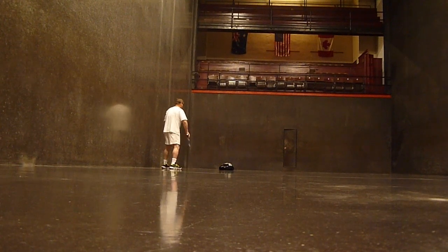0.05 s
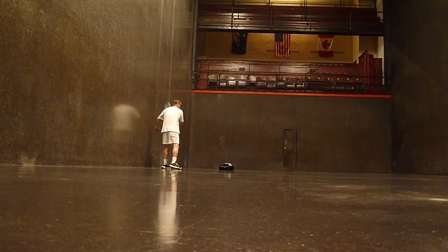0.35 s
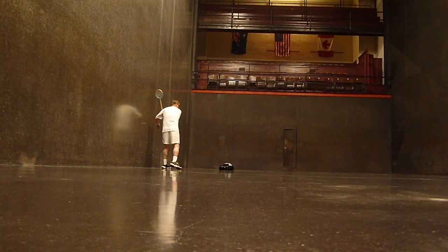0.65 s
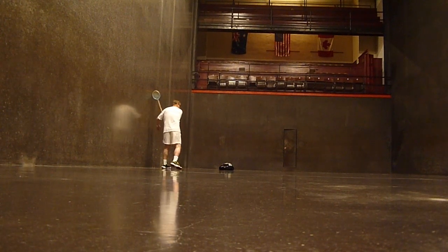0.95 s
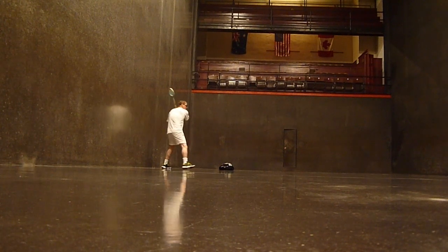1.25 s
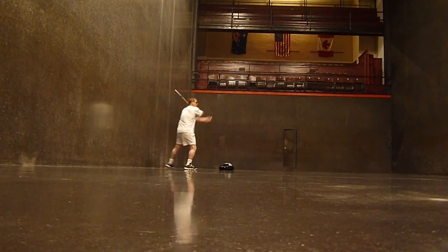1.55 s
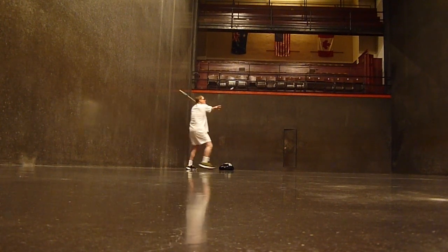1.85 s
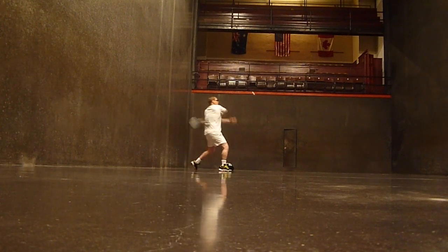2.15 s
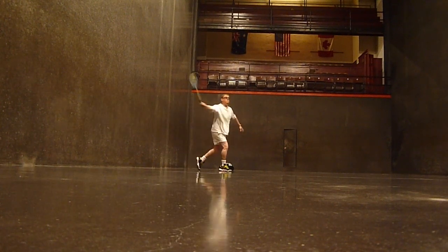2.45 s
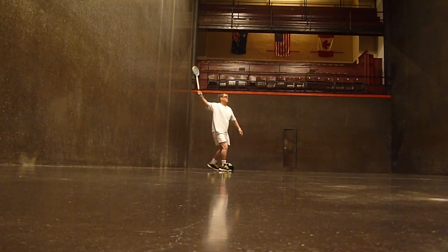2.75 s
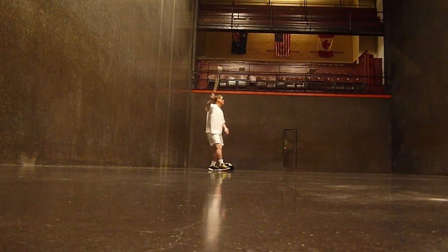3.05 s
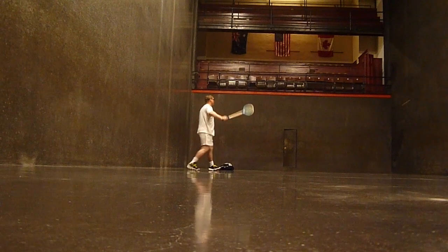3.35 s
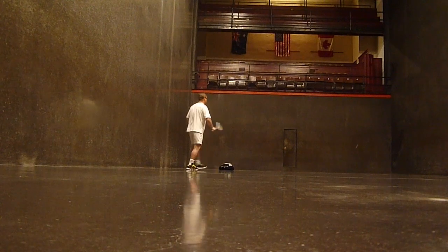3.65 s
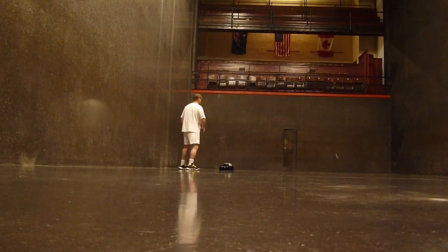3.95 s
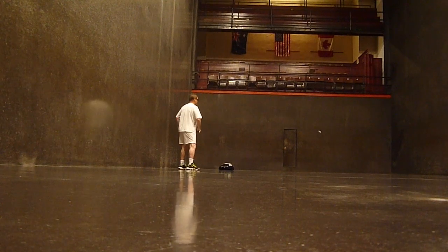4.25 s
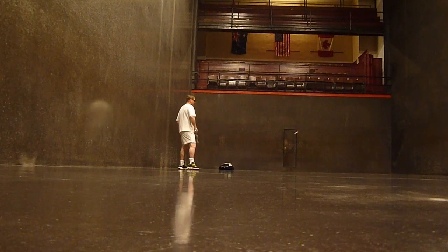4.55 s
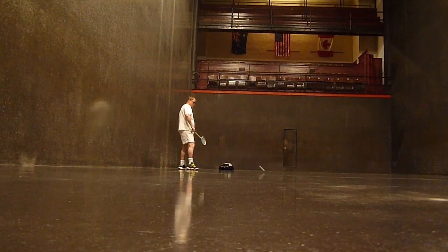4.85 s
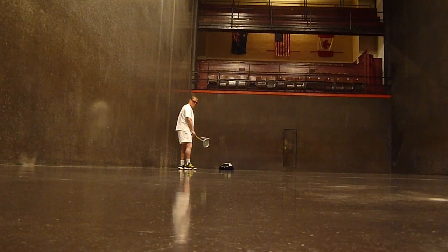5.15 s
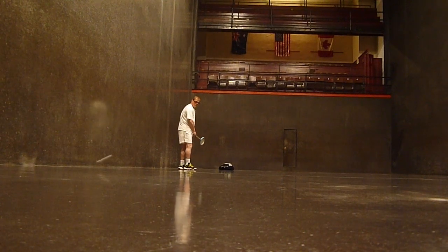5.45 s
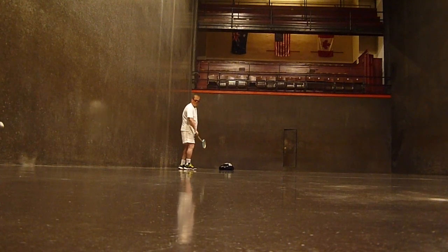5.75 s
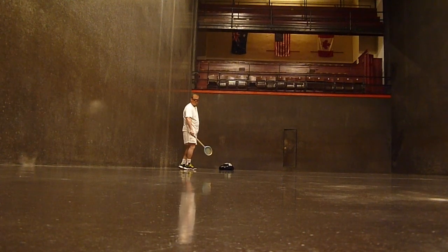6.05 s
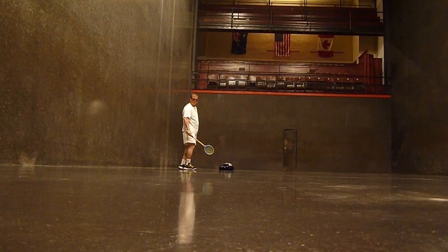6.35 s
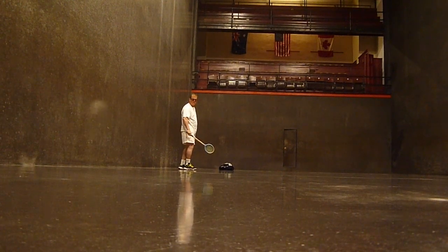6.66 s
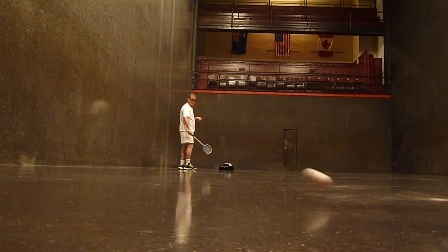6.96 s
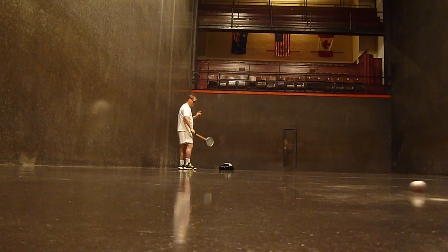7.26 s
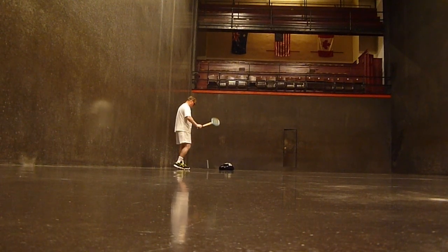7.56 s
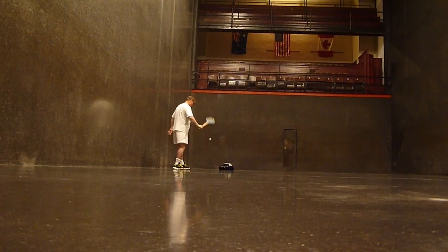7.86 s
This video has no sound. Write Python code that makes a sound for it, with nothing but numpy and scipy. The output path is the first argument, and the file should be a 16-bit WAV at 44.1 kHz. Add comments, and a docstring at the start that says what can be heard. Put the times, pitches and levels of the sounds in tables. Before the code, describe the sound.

A hard ball is served, cracks sharply against two walls with long ringing echoes, then bounces closer and knocks on a wooden panel.

```python
"""A small hard ball is served in a big stone-walled indoor court, heard from low at the front wall.
Air rushes round the racket, the strings pock, and the ball cracks on walls and floor, thuds into a
wooden panel nearby and bounces away. Each blow returns as slap echoes, timed by its place in the
court, and rings for seconds in the hall. Soft steps and a quiet ventilation rumble lie underneath."""
import sys
import numpy as np
from scipy import signal
from scipy.fft import rfft, irfft, next_fast_len
from scipy.io import wavfile

SR = 44100
rng = np.random.default_rng(int(sys.argv[2]) if len(sys.argv) > 2 else 0)


def log_audio(samples):
    """Write samples as a 16-bit WAV file to the path given in sys.argv[1]."""
    # one column per channel
    frames = np.atleast_2d(samples).T
    # limit to full scale, then quantise
    limited = np.clip(frames, -1, 1)
    pcm = np.round(limited * 32767).astype(np.int16)
    wavfile.write(sys.argv[1], SR, pcm)


N = 352387
TIME = np.arange(N) / SR
FREQ = np.arange(2049) * SR / 4096
# The smack of ball on strings. Each row: frequency in Hz, level in dB.
SMACK_SPECTRUM = [(60, -15), (150, -3), (300, -4.5), (600, 0.5), (1100, 4), (1520, -3.5), (2500, -7.5),
                  (4000, -11.5), (6400, -10.5), (7500, -22)]
# The wooden panel's modes, lowest first. Each row: frequency in Hz, level in dB, t60 in seconds.
PANEL_MODES = [(173.2, -2, 0.165), (205.06, -1, 0.1054), (279.8, -3.5, 0.0573), (407, -2.5, 0.047),
               (530.5, -2, 0.0237), (1004, -15, 0.012), (1420, -5.5, 0.0115), (5825, -11.5, 0.0099)]


def rally(field):
    """The ball's blows, each with its slap echoes and the long ring of the hall."""
    # A bounce still dying away as we come in: seconds before the start, centre in Hz, hall level in dB.
    before_s, tail_hz, tail_db = (.35, 3200, -47)
    out = np.zeros(N)
    for s, surface, place, db, sideways, end_db, direct, send, hall_db, build_s in blows():
        for sound in echoes(direct, send, place, surface, sideways, end_db):
            add(out, s, undb(db) * sound)
        add(out, s, undb(hall_db) * reverberate(send, field, build_s))
    add(out, -before_s, undb(tail_db) * reverberate(ball_click(tail_hz), field, build_s=0.036))
    return out


def blows():
    """Every hit on stone, strings or wood, with a direct sound and a send to the hall."""
    # Ball on stone. Each row: start in seconds, surface, x, y, z in metres, peak in dB, click centre
    # in Hz, send centre in Hz, sideways share 0-1, gain per end-wall reflection in dB, hall level
    # in dB, hall build-up in seconds.
    bounces = [ (2.6096, "end", 5.5, 0, 4, -5.5, 3520, 3980, 0.35, 0, -32, 0.0656),
               (3.7075, "end", 8.0, 18.5, 1.0, -9.5, 3604, 3377, 0.17, -2.5, -39.5, 0.095),
               (4.9475, "floor", 2.5, 10, 0, -34.5, 4000, 3087, .1, -3, -50, 0.037),
               (5.5857, "floor", 1.1, 5.5, 0, -33, 2610, 2555, 0.18, -3, -55, 0.036),
               (5.7348, "side", 0, 4.5, 0.89, -20, 2965, 2560, 0.55, -5.5, -51.5, .033),
               (6.1467, "floor", 1.1, 2.5, 0, -28, 2210, 2078, 0.1, -3.5, -58, 0.042),
               (6.4924, "floor", 1.38, 0.8, 0.5, -27.5, 1600, 1493, .4, -4, -63.5, .059),
               (6.8871, "floor", 2, 1.33, 0, -24.5, 1617, 1895, 0.21, -4, -64, .043),
               (7.0809, "floor", 2.5, 2.28, -0.5, -36.5, 1404, 1409, .5, -5.5, -75, .04),
               (7.6914, "floor", 1.9, 9.5, 0, -28.5, 3600, 3444, 0.19, -3, -47.5, 0.026)]
    # The serve and the thud on the panel: one such row each, without the two centres.
    serve = (2.3802, "end", 2.5, 9.1, 1.193, -16, 0.56, -7, -37.5, 0.005)
    thud = (6.5538, "end", 1.7, 0, .06, -14, .4, -2, -38, 0.0062)
    hits = [(s, surface, (x, y, z), db, sideways, end_db, ball_click(hz), ball_click(send_hz), *hall)
            for s, surface, x, y, z, db, hz, send_hz, sideways, end_db, *hall in bounces]
    for row, direct, send in (serve, racket(), pulse(SMACK_SPECTRUM)), (thud, panel(), panel_boom()):
        s, surface, x, y, z, db, sideways, end_db, *hall = row
        hits.append((s, surface, (x, y, z), db, sideways, end_db, direct, send, *hall))
    return hits


def ball_click(hz, rise=0.899, fall=3.433):
    """A small stiff ball radiates little bass, and its contact time cuts the treble."""
    ratio = FREQ / hz
    return impulse(ratio ** rise / np.sqrt(1 + ratio ** (2 * (rise + fall))))


def racket(strings_db=-7):
    """A broad smack with the strings' pock in it."""
    # The strings' brief ring. Each row: frequency in Hz, level in dB, t60 in seconds.
    string_modes = [(304.6, -6.5, 0.0238), (581, 0, 0.0234), (797, -1.5, 0.0217), (1050, -4, 0.0153),
                    (1340, -6, 0.0156), (1810, -1, 0.0174), (2198, -6.5, 0.0227), (3344, -13, 0.0089),
                    (4480, -7, 0.0157)]
    pock = undb(strings_db) * ring(string_modes, contact_s=0.0009)
    smack = pulse(SMACK_SPECTRUM)
    return pock + np.pad(smack, (0, len(pock) - len(smack)))


def panel(leak_hz=55):
    """The struck panel rings; air leaks round its edges and cancels the deepest bass."""
    low_cut = signal.butter(2, leak_hz, "high", fs=SR, output="sos")
    return signal.sosfilt(low_cut, ring(PANEL_MODES, contact_s=0.00079))


def panel_boom(ring_db=-17):
    """The panel's broad thump, with its lowest mode sounding on into the hall."""
    # The thump's colour. Each row: frequency in Hz, level in dB.
    thump_spectrum = [(50, -13.5), (120, -4), (170, 2.5), (210, -3), (280, -5), (380, -15.5), (600, -21),
                      (1200, -30.5), (3000, -47), (7000, -53)]
    thump = pulse(thump_spectrum)
    hum = undb(ring_db) * ring(PANEL_MODES[:1], contact_s=0.00086)
    return hum + np.pad(thump, (0, len(hum) - len(thump)))


def knocks():
    """Dull knocks under the bounces close beside the wall."""
    # Each row: start in seconds, rms level in dB, length in seconds, centre in Hz.
    close_bounces = [(6.148, -45, 0.0168, 648), (6.495, -43, 0.0134, 650)]
    out = np.zeros(N)
    for s, db, length_s, hz in close_bounces:
        noise = scattered(np.zeros(1), np.ones(1), length_s)
        burst = signal.fftconvolve(noise, ball_click(hz, rise=1.07, fall=3))
        add(out, s, undb(db) * burst / np.std(burst[:int(length_s * SR)]))
    return out


def air_rushes():
    """Air swells round the swung racket, then round the incoming ball, and stops at each impact."""
    # Each row: end in seconds, length in seconds, final rms level in dB, centre in Hz.
    swells = [(2.378, 0.041, -52, 1500), (2.611, 0.014, -28, 600)]
    out = np.zeros(N)
    for end_s, length_s, db, hz in swells:
        air = steady_noise(ball_click(hz, rise=0.55, fall=1.5))
        swell = np.clip(1 + (TIME - end_s) / length_s, 0, 1) * (TIME < end_s)
        out += undb(db) * air * swell
    return out


def echoes(direct, send, place, surface, sideways, end_db):
    """A blow with sharp and blurred echoes: stone mirrors it; uneven walls, roof and gallery scatter."""
    side_db, floor_db, roof_db = -1.33, -2.5, -14  # per reflection
    wall_scatter_db, gallery_scatter_db, roof_scatter_db = -11.5, -7, -3.5
    sharp_for_s, gallery_after_s = 0.322, 0.042
    lag_s, gain, (across, along, up) = mirror_paths(place, surface, sideways)
    roof_hits = (np.abs(up) + (up > 0)) // 2
    back_hits = (np.abs(along) + (along > 0)) // 2
    gain = gain * undb(side_db * np.abs(across) + floor_db * (np.abs(up) - roof_hits))
    kept = undb(end_db * np.abs(along))
    fade = np.exp(-(lag_s / sharp_for_s) ** 4)  # uneven walls give no sharp late echoes
    sharp = signal.fftconvolve(arrivals(lag_s, gain * kept * fade * undb(roof_db * roof_hits)), direct)
    under_roof = gain * (roof_hits == 0)
    walls = scattered(lag_s, under_roof * kept * (np.abs(across) + np.abs(along) > 2))
    # The gallery over the back wall scatters what that wall does not mirror.
    gallery = scattered(lag_s, under_roof * (1 - kept) * (back_hits == 1) * (lag_s > gallery_after_s))
    roof = scattered(lag_s, gain * kept * (roof_hits == 1))
    scatter = (undb(wall_scatter_db) * walls + undb(gallery_scatter_db) * gallery
               + undb(roof_scatter_db) * roof)
    blurred = signal.fftconvolve(scatter, send)
    first_peak = np.abs(sharp[:SR // 400]).max()
    return sharp / first_peak, blurred / first_peak


def mirror_paths(place, surface, sideways, orders=(9, 7, 3), beam_power=3.1, sound_m_s=343):
    """A blow's images in the court's six faces: lag in seconds, gain, signed reflections per axis."""
    # The court: width, length and height in metres.
    court = (9.22, 18.22, 11.8)
    # The microphone: metres from the left wall, the front wall and the floor.
    mic = (2.35, .18, .155)
    # The axis along which each surface is struck; a blow radiates most along it.
    strike_axis = {"side": 0, "end": 1, "floor": 2}
    grid = np.meshgrid(*[np.arange(-k, k + 1) for k in orders])
    images = np.stack(grid, axis=-1).reshape(-1, 3)
    ray = images * np.array(court) + np.where(images % 2, np.subtract(court, place), place) - mic
    metres = np.linalg.norm(ray, axis=1)
    aim = sideways + (1 - sideways) * (np.abs(ray[:, strike_axis[surface]]) / metres) ** beam_power
    return (metres - metres.min()) / sound_m_s, aim / metres, images.T


def arrivals(lag_s, sizes):
    """One spike for each path in the first half second."""
    return np.bincount(np.round(lag_s * SR).astype(int), sizes, minlength=SR // 2)[:SR // 2]


def scattered(lag_s, gains, smear_s=0.016):
    """Many small reflections smear each arrival into a short burst."""
    t = TIME[:SR // 4] / smear_s
    burst = t * np.exp(-4 * t)
    power = signal.fftconvolve(arrivals(lag_s, gains ** 2), burst / burst.sum())[:SR // 2]
    return np.sqrt(np.abs(power)) * rng.standard_normal(len(power))


def reverberate(sound, field, build_s, gap_s=.022, grain=.5, blend_s=0.2):
    """Reflections start after a gap, grainy at first, and thicken into a smooth tail; early rms 1."""
    bands, decays = field
    length = decays.shape[1]
    start = rng.integers(N - length)  # each sound gets its own pattern of reflections
    tail = np.einsum("bt,bt->t", bands[:, start:start + length], decays)
    t = np.maximum(TIME[:length] - gap_s, 0)
    spread = grain * np.exp(-t / blend_s)
    clumps = np.interp(t, np.arange(1000) / 1000, rng.standard_normal(1000))
    tail = tail * (1 - np.exp(-t / build_s)) * np.exp(spread * clumps - spread ** 2)
    wet = signal.oaconvolve(tail, sound)
    return wet / np.std(wet[SR // 20:SR // 3])


def hall_field():
    """Half-octave bands of diffuse sound, each with its own decay."""
    # How long the hall rings. Each row: frequency in Hz, t60 in seconds.
    ring_times = [(80, 5), (200, 5.5), (700, 5), (1500, 4.5), (2700, 4), (4200, 3), (6000, 1.86),
                  (7500, 0.23)]
    # The hall's colour. Each row: frequency in Hz, level in dB.
    hall_spectrum = [(50, 2), (170, 9), (280, 10), (450, 3), (800, 1.5), (1500, -2), (3000, -0.5),
                     (4500, 1), (5600, 1.5), (7000, -1)]
    centres = 45 * 2 ** (np.arange(16) / 2)
    size = next_fast_len(N)
    hz = np.maximum(np.arange(size // 2 + 1) * SR / size, centres[0])
    noise = rfft(rng.standard_normal(size)) * undb(lookup(hall_spectrum, hz))
    windows = (np.maximum(1 - 2 * np.abs(np.log2(hz / centre)), 0) for centre in centres)
    bands = np.array([irfft(noise * window, size)[:N] for window in windows])
    decays = np.exp(-np.log(1000) * TIME[:5 * SR] / lookup(ring_times, centres)[:, None])
    return bands, decays


def footsteps(field):
    """Soft, dull footfalls, heard only through the hall's reverberation."""
    # Each row: start in seconds, hall level in dB, build-up in seconds.
    steps = [(.835, -52, 0.024), (1.58, -66, 0.035), (1.86, -65.5, .03), (3.86, -56, .05),
             (4.97, -61, 0.022)]
    # Shoe on stone. Each row: frequency in Hz, level in dB.
    shoe_spectrum = [(60, -18), (160, -3), (240, -1.5), (350, 0.5), (680, 0.5), (860, 2.5), (1020, -10),
                     (1500, -7), (1900, -22), (7000, -42)]
    out = np.zeros(N)
    for s, db, build_s in steps:
        add(out, s, undb(db) * reverberate(pulse(shoe_spectrum), field, build_s))
    return out


def ventilation(rms_db=-53):
    """The quiet, steady rumble of moving air."""
    # Each row: frequency in Hz, relative level in dB.
    rumble_spectrum = [(20, -11), (45, -8.5), (80, -1), (130, 1), (175, 2), (260, -2.5), (500, -9),
                       (1000, -16.5), (2000, -21.5), (4000, -25), (7000, -30.5)]
    return undb(rms_db) * steady_noise(pulse(rumble_spectrum))


def ring(modes, contact_s):
    """Damped modes pushed together during a short contact; peak 1."""
    t = TIME[:SR // 4]
    sound = sum(undb(db - 60 * t / t60) * np.cos(2 * np.pi * hz * t) for hz, db, t60 in modes)
    sound *= 1 - np.exp(-t / contact_s)
    return sound / np.abs(sound).max()


def steady_noise(colour):
    """Noise with the spectrum of the given pulse; rms 1."""
    noise = signal.oaconvolve(rng.standard_normal(N), colour)[:N]
    return noise / np.sqrt(np.mean(noise ** 2))


def pulse(spectrum):
    """A single pulse coloured by (Hz, dB) points."""
    return impulse(undb(lookup(spectrum, FREQ)))


def impulse(gain):
    """Shortest causal pulse with this gain over FREQ; peak 1."""
    cepstrum = irfft(np.log(gain + 1e-5))
    cepstrum[1:len(gain) - 1] *= 2
    cepstrum[len(gain):] = 0
    click = irfft(np.exp(rfft(cepstrum)))
    return click / np.abs(click).max()


def lookup(table, hz):
    """Read (Hz, value) points on a log-frequency axis."""
    points, values = np.transpose(table)
    return np.interp(np.log(np.maximum(hz, 1)), np.log(points), values)


def undb(db):
    """Decibels to gain."""
    return 10 ** (np.asarray(db) / 20)


def add(out, s, sound):
    """Mix a sound in at time s, which may lie before the start."""
    start = int(round(s * SR))
    part = sound[max(-start, 0):][:N - max(start, 0)]
    out[max(start, 0):max(start, 0) + len(part)] += part


def scene():
    """Ball, player and ventilation in one hall; one microphone feeds both channels."""
    field = hall_field()
    mono = rally(field) + air_rushes() + knocks() + footsteps(field) + ventilation()
    return np.array([mono, mono])


def record(dry, offset=0.01677, lopsided_db=31, sag_hz=15, top_hz=7050):
    """The input stage sits off centre and loud cracks push it slightly further; a steep treble cut."""
    slew = np.diff(dry, prepend=0)
    push = signal.sosfilt(signal.butter(1, sag_hz, fs=SR, output="sos"), slew ** 2)
    high_cut = signal.ellip(8, .3, 70, top_hz, fs=SR, output="sos")
    return offset + signal.sosfilt(high_cut, dry + undb(lopsided_db) * push)


dry = scene()
out = record(dry)
log_audio(out)
```